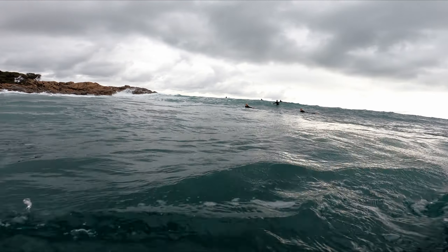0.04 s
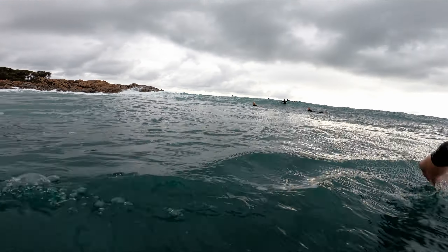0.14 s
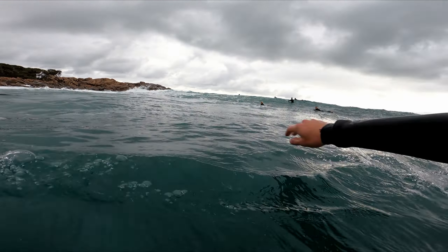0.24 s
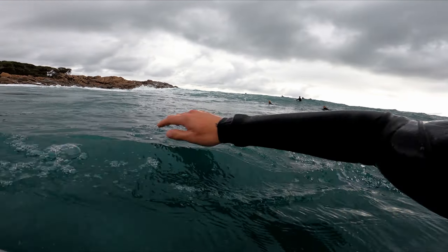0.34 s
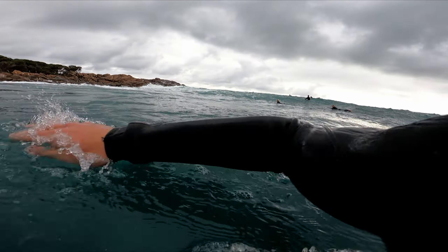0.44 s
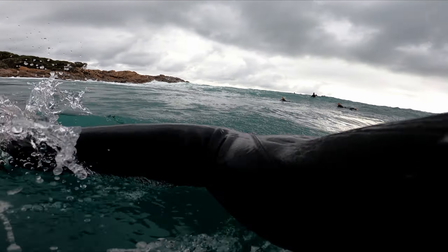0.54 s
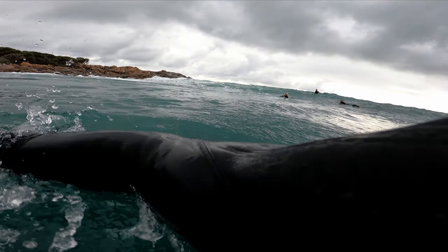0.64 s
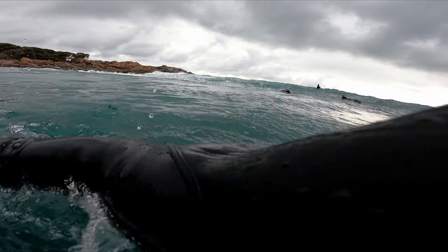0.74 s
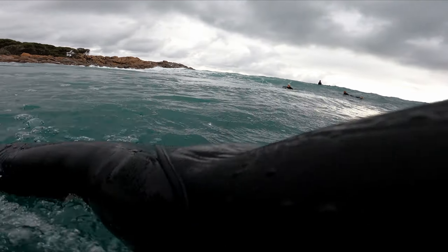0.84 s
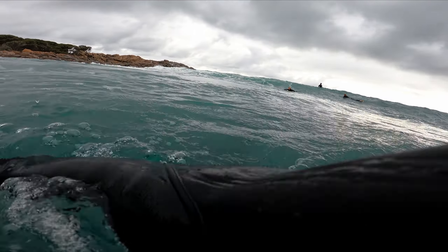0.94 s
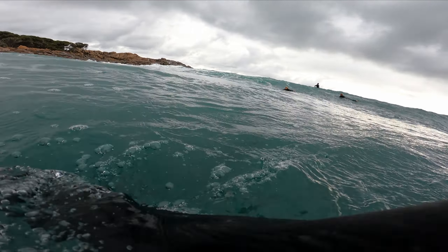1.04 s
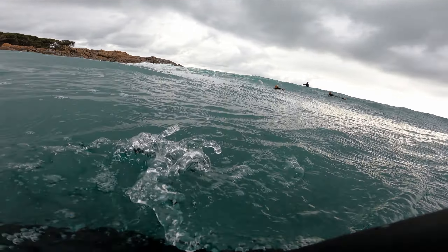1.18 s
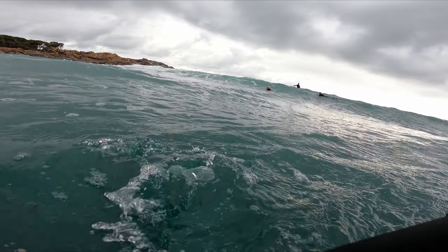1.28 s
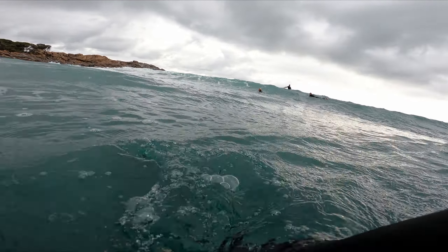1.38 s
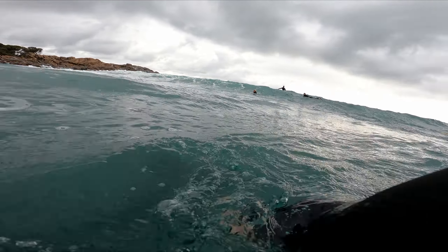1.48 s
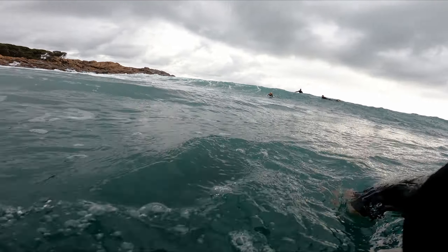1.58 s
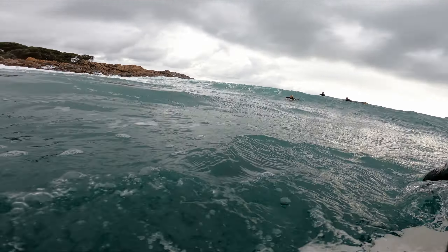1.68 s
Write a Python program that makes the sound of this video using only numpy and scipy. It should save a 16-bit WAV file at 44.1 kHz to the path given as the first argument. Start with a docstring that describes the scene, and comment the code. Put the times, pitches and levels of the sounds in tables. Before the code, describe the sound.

Open choppy sea, recorded extremely close by a camera in a housing at water level. From 0 s spray fizzes while water gurgles low over the housing and patters with a hollow ring near 1 kHz. From 0.2 to 1 s paddling splashes bring crisp droplets, slaps and small gulping air pockets; short bubbly blips continue to 1.5 s. At 1.5-1.7 s wet rubber squelches in quick gliding squeaks, with wind thumps, then a coarser rub at 2 s with strong gurgling. Drops tick around 2.3-2.5 s; near 3 s the water sags away and quietens. Surges and glugs crowd 3.2-4.4 s, with a short squeak at 4.1 s and a wind gust near 4.5 s. Spray becomes even foam hiss, swelling from 5.2 s to 6 s, with faint rubbery slips around 5.4 s. Bright spray sits left, hollow muffled water right.

```python
"""A surfer paddles through choppy sea with a camera at water level, in wind that swells and dies for six seconds.
From the start spray fizzes, and surge after surge gurgles over the housing, rings its hollow near 1 kHz and often
muffles the spray. Wet rubber first squelches at 1.5 s; the water sags away most deeply near 3 s.
From about 4.3 s the spray is mostly even foam, and it swells toward the end.
The open left port hears the spray; the flooded right one hears mostly the housing."""
import sys
import numpy as np
from scipy import signal
from scipy.fft import rfft, irfft, next_fast_len
from scipy.io import wavfile
from scipy.ndimage import uniform_filter1d, minimum_filter1d, map_coordinates

SR = 44100
rng = np.random.default_rng(int(sys.argv[2]) if len(sys.argv) > 2 else 0)


def digitize_waveform(pressure):
    """Quantize a signal to 16-bit integers and store it at the path in sys.argv[1].

    Rows of a 2-D input are taken as channels; values are limited to [-1, 1].
    """
    field = np.atleast_2d(pressure).T
    bounded = np.clip(field, -1, 1)
    quanta = np.round(bounded * 32767).astype(np.int16)
    wavfile.write(sys.argv[1], SR, quanta)


N = 266805  # samples, about 6.05 s

# All levels in the tables are relative: filters, trims and the two ports act on them later.
# water washing over the housing: t/s, length/s, gurgle rise/dB, patter rise/dB, muffling of the spray/dB
SURGES = [(0, .068, 8.5, 2, 2.5), (0.273, 0.045, 0.5, 4.5, -6.5), (0.648, 0.23, 0, 3, 0),
          (0.793, 0.19, 3.5, 3.5, 11.5), (1.031, 0.025, 8.5, 5.5, 0.5), (1.253, 0.041, -7, 2.5, -6),
          (1.368, 0.032, 0, 10.5, 3), (1.499, 0.087, -3, 3.5, 5.5), (1.585, 0.12, 14.5, 6.5, 7),
          (2.015, 0.17, 12.5, 14, 11.5), (2.567, 0.23, 5, 3, 0.5), (2.788, 0.17, 10.5, 4, 11.5),
          (2.859, 0.054, 3, 4, 7), (3.176, 0.047, 6, 6, 5), (3.236, 0.13, 9, 5.5, 10.5),
          (3.399, 0.035, 0, 5, 6), (3.55, .22, 7.5, 3, 14), (3.631, 0.057, 6, 5.5, 0),
          (3.959, 0.11, 6.5, 2, -2), (4.125, 0.033, 1, 12, 14), (4.181, 0.13, 6, -1.5, 4.5),
          (4.379, 0.14, 6, -2.5, 2.5), (4.602, 0.062, 10, 0.5, -5.5), (4.718, 0.022, 11.5, 5, 1.5),
          (4.985, 0.16, 4.5, 1, -0.5), (5.288, 0.074, 9, 5, 8), (5.463, 0.072, 6.5, 5, 8),
          (5.534, 0.061, 6.5, 6, -5), (5.626, .17, -1.5, -0.5, -10), (5.871, 0.033, 3.5, -5.5, 0.5)]
# pockets of trapped air: t/s, length/s, first f/Hz, last f/Hz, bow of the glide/octaves, level/dB
POCKETS = [(.045, 0.029, 191, 155.6, -0.11, -19), (.622, 0.072, 282, 326, -.12, -25.5),
           (0.679, 0.036, 880, 683, 0, -20), (0.686, .022, 1040, 915, 0, -19.5),
           (.718, 0.032, 1028, 1210, .04, -22), (.84, 0.021, 446, 377, 0, -19.5),
           (0.844, 0.092, 213, 131, -.3, -13), (.938, .02, 500, 545, 0, -24.5),
           (.945, .04, 133.6, 194, 0.065, -20.5), (.997, .075, 152.3, 143.4, 0, -21.5),
           (1.037, 0.017, 1290, 1504, 0, -26.5), (1.051, 0.012, 1086, 572, -0.084, -22),
           (1.128, 0.014, 1150, 1060, 0, -23), (1.172, .012, 1090, 1200, 0, -18.5),
           (1.213, .02, 1220, 1120, 0, -21.5), (1.27, .013, 954, 1130, 0, -16.5),
           (1.321, 0.02, 1460, 940, -0.059, -21), (1.381, 0.025, 940, 1035, 0, -23.5),
           (1.405, .029, 498, 704, -0.067, -23.5), (1.416, .009, 1200, 1206, 0, -21.5),
           (1.454, 0.0072, 1104, 1266, 0.083, -16.5), (1.624, .014, 202, 150, -0.32, -25),
           (1.855, 0.0074, 1414, 1710, 0, -21.5), (1.888, 0.019, 1020, 1146, .05, -18),
           (1.914, .024, 1070, 1400, 0, -21.5), (1.934, 0.0073, 1830, 1990, 0.049, -19.5),
           (2.019, .032, 198, 147.6, -.08, -13), (2.058, .045, 147.7, 115, 0.072, -22),
           (2.128, .028, 159, 148, 0.023, -14), (2.172, 0.037, 164, 151, 0, -18),
           (2.536, 0.022, 973, 1085, 0, -23), (2.559, 0.0096, 1156, 1340, 0, -23),
           (2.608, .045, 817, 600, 0, -24), (2.79, 0.028, 169.6, 230, 0.1, -18),
           (2.825, .028, 231, 159.4, 0.067, -20), (2.623, .009, 1360, 1233, 0, -21),
           (2.857, 0.029, 248, 452, 0.25, -18.5), (2.889, 0.014, 982, 1123, 0, -18),
           (2.9, 0.017, 406, 264, -0.062, -17), (2.924, 0.036, 293, 125.4, 0, -26.5),
           (3.174, 0.024, 914, 1190, -0.069, -24.5), (3.197, 0.038, 297, 191, .55, -17.5),
           (3.256, 0.044, 876, 968, 0.023, -26), (3.303, 0.057, 1018, 943, 0.032, -24.5),
           (3.289, 0.065, 123, 267, 0, -20.5), (3.362, 0.028, 175, 139, -0.086, -18.5),
           (3.547, 0.0066, 1214, 1100, 0, -21.5), (3.573, 0.014, 186, 222, -0.048, -16.5),
           (3.61, .028, 171, 219, 0, -15), (3.644, 0.041, 202, 303, 0.23, -18.5),
           (3.712, 0.04, 872, 1038, -.03, -16), (3.72, .055, 295, 158.5, -.2, -20),
           (3.733, 0.02, 1043, 1370, 0, -23), (3.745, .022, 924, 964, 0, -20),
           (3.835, 0.03, 245, 188.4, 0.098, -18), (3.955, .055, 180.5, 201, -.04, -18.5),
           (4.011, 0.018, 965, 1063, 0, -20.5), (4.013, 0.054, 233, 171.5, 0, -20),
           (4.144, .009, 280, 850, .15, -23), (4.149, .018, 860, 1075, .07, -15),
           (4.166, 0.0091, 1133, 1710, 0, -34.5), (4.184, 0.027, 272, 165.5, 0.22, -19),
           (4.205, 0.013, 988, 419, 0.066, -19.5), (4.265, 0.036, 402, 429, .55, -22.5),
           (4.266, .014, 804, 1057, 0, -20), (4.31, 0.063, 1070, 1108, -.16, -35.5),
           (4.317, 0.038, 113.5, 160, 0.16, -19), (4.383, 0.036, 113, 123.6, -.1, -16),
           (4.425, .095, 157, 137.5, 0.25, -23.5), (4.6, 0.08, 180.7, 161.7, -.06, -19),
           (4.82, 0.023, 201, 195, 0, -17.5), (5.012, .044, 226.5, 245, .62, -21),
           (5.079, .03, 193, 160, 0.091, -17.5), (5.305, 0.012, 884, 962, -0.056, -19),
           (5.3, .035, 151, 200, 0.13, -20.5), (5.482, .026, 177, 347, 0, -20),
           (5.675, 0.029, 228, 172, 0, -24), (5.872, .028, 193, 218, 0, -19.5)]
# wet rubber slipping on the mount: t/s, length/s, first slip rate f/Hz, last slip rate f/Hz,
# bow of the glide/octaves, level/dB, change per harmonic/dB, grit (a plain factor)
SLIPS = [(1.492, .027, 287, 588, -0.068, -16.5, -7, 0.33), (1.536, .031, 218, 600, -0.023, -21, -7, 0.49),
         (1.59, .021, 474, 267, -0.19, -18, -2.5, .5), (1.607, 0.047, 268, 183, .08, -23.5, 0.5, .45),
         (1.652, 0.049, 180.8, 204, -.07, -23.5, 0.3, .5), (1.695, 0.041, 208.8, 184.4, 0, -25.5, 0.27, .5),
         (2.021, .075, 168.5, 108.8, 0, -29, 0.5, 1.8), (2.092, 0.088, 116.6, 137.2, 0, -26, 0, 1.5),
         (4.113, .026, 201.5, 701, -0.036, -16.5, -1, .7), (4.124, .021, 558, 918, -0.015, -16.5, 0, 1.2),
         (4.267, 0.033, 144.8, 122.5, 0.045, -25, -0.5, 1.9), (5.345, .02, 389, 475, 0, -16, -2.5, 1.7),
         (5.363, .019, 451, 354, -0.024, -19.5, 0.5, 3.4), (5.538, .088, 130.6, 105, -0.012, -27.5, 0, 4.2)]
# colour of droplets at the open port: f/Hz, level/dB
DROPLET_COLOUR = [(300, -9.5), (1000, 11.5), (1800, -4.5), (2400, -6.5), (3200, -5.5), (4000, -2),
                  (4400, -5.5), (5100, -12.5), (6200, -15.5), (7200, -22.5), (8500, -39), (10000, -48),
                  (11800, -36), (13200, -63.5)]
# colour of the finest drops: f/Hz, level/dB
MIST_COLOUR = [(1500, -30), (3000, -5.5), (4000, 4), (5000, 1), (6200, -1), (7200, -10.5), (8500, -29.5),
               (10000, -45.5), (11800, -37.5), (13200, -60)]
# colour of the housing when water strikes it hard: f/Hz, level/dB
HARD_COLOUR = [(150, -28.5), (500, -2.5), (900, -2), (1400, -4), (1800, -13.5), (2250, -15.5),
               (3000, -44.5), (5000, -87.5)]
SURGE_EDGE_S = 0.013  # time in which a surge arrives, and leaves


def amp(db):
    """Decibels to gain."""
    return 10 ** (np.asarray(db) / 20)


def unit(x):
    """Scale x to an overall rms of 1."""
    return x / np.sqrt(np.mean(x ** 2) + 1e-20)


def steady(x, size):
    """Even out x so that its rms stays near 1 over stretches of about size samples."""
    power = uniform_filter1d(x ** 2, size, axis=-1)
    power = uniform_filter1d(power, size // 2, axis=-1)
    return x / np.sqrt(np.abs(power) + 1e-12)


def along(points, hz):
    """Read (Hz, value) points on a log frequency axis."""
    f, v = np.transpose(points)
    return np.interp(np.log(hz + 1), np.log(f + 1), v)


def curve(rows):
    """Join (s, value) rows by straight lines, one value per sample."""
    return np.interp(np.arange(N) / SR, *np.transpose(rows))


def wobble(rate):
    """A smooth random curve with rate random knots a second."""
    knots = rng.standard_normal(int(N * rate / SR) + 4)
    return map_coordinates(knots, [np.arange(N) * rate / SR])


def add(track, s, sound):
    """Mix a sound into a track at time s."""
    part = track[max(round(s * SR), 0):][:len(sound)]
    part += sound[:len(part)]


def grid():
    """A padded FFT length and its frequencies."""
    size = 2 * next_fast_len(N // 2 + 8192)
    return size, np.fft.rfftfreq(size, 1 / SR)


def coloured(x, spectrum):
    """Filter x to a (Hz, dB) shape; the folded cepstrum makes the filter causal, with no echo ahead of a sound."""
    size, hz = grid()
    cepstrum = irfft(np.log(amp(along(spectrum, hz))))
    cepstrum[1:size // 2] *= 2
    cepstrum[size // 2 + 1:] = 0
    response = np.exp(rfft(cepstrum))
    return irfft(rfft(x, size) * response, size)[..., :N]


def bubbles(rate, low_hz, high_hz, cycles, spread_db, glide):
    """A cloud of fading, gliding bubble tones, rate per second: many are weak, a few strong."""
    count = int(rate * N / SR)
    when, pitch, size, life, bend = rng.random((count, 5)).T[:, :, None]
    hz = low_hz + (high_hz - low_hz) * pitch
    span = cycles * (.5 + life) / hz  # seconds to fade by 40 dB
    step = np.arange(int(min(1.5 * cycles / low_hz, .12) * SR))
    t = step / SR
    age = np.minimum(t / span, 2)
    bent_hz = hz * (1 + glide * (2 * bend - .5) * age / 2)
    tone = np.sin(2 * np.pi * bent_hz * t) * amp(-40 * age)
    gain = np.sqrt(hz) * amp(-spread_db * np.log(.01 + size))
    place = (when * N).astype(int) + step
    return unit(np.bincount(place.ravel(), (gain * tone).ravel(), N)[:N])


def froth(cloud, wash_db, spectrum):
    """Two unrelated bubble clouds, each on a wash of noise, coloured and set to rms 1."""
    raw = np.array([cloud(), cloud()]) + amp(wash_db) * rng.standard_normal((2, N))
    return unit(coloured(raw, spectrum))


def sweep(length, first_hz, last_hz, bow):
    """Progress 0-1 and phase of a pitch glide that arches by bow octaves at its middle."""
    u = np.linspace(0, 1, max(int(length * SR), 2))
    arch = 2 ** (bow * (1 - (2 * u - 1) ** 2))
    hz = first_hz * (last_hz / first_hz) ** u * arch
    return u, 2 * np.pi * np.cumsum(hz) / SR


def retuned(pair, hz):
    """Read a ringing pair faster or slower, so its resonance follows the curve relative to the curve's mean."""
    place = np.cumsum(hz / hz.mean())
    return np.array([map_coordinates(x, [place], mode="mirror") for x in pair])


def plinks(rows, cycles, click_db, spectrum):
    """Each impact is a sharp click and a short ring, which falls 60 dB in the given cycles; then all is coloured."""
    track, t = np.zeros(N), np.arange(SR // 20) / SR
    for s, db, hz in rows:
        ring = np.cos(2 * np.pi * hz * t) * amp(-60 * t * hz / cycles)
        click = amp(click_db) * (t == 0)
        add(track, s, amp(db) * (ring + click))
    return coloured(track, spectrum)


def swells(rows, edge_s):
    """Level change in dB from (s, length s, dB) events that rise, hold and fall."""
    total = 0
    for s, length, db in rows:
        end = s + max(length, edge_s) - edge_s / 2
        total = total + curve([(s - edge_s / 2, 0), (s + edge_s / 2, db), (end, db), (s + length + edge_s / 2, 0)])
    return total


def hush(rows, depth_db):
    """Level change in dB while the listed events take the place of loose, churning water."""
    t = np.arange(N) / SR
    covered = np.any([(t > s) & (t < s + length) for s, length, *_ in rows], axis=0)
    return -depth_db * uniform_filter1d(covered.astype(float), size=400)


def gaps_db(pockets):
    """Loose water gives way to a ringing pocket of air, and far more while the rubber slips."""
    return np.minimum(hush(pockets, 3.5), hush(SLIPS, 15))


def trough_db():
    """Loss of level as the water sags away from the housing and returns."""
    # the water drops away: t/s, length/s, depth/dB
    sags = [(0.211, 0.049, 3.5), (0.966, 0.068, 7), (1.469, 0.02, 4), (1.518, 0.023, 5),
            (1.561, 0.022, 6.5), (1.737, 0.08, 1), (2.145, 0.15, 11.5), (2.904, 0.06, 10.5),
            (2.917, 0.24, 18.5), (2.949, 0.022, 9), (3.341, 0.028, 5.5), (3.498, 0.054, 15.5),
            (3.809, 0.13, 9), (4.05, 0.066, 7.5), (4.154, 0.046, 15), (4.357, 0.07, 4.5), (4.676, 0.076, 3),
            (4.756, 0.036, 10.5)]
    t = np.arange(N) / SR
    return sum(db * np.sin(np.pi * np.clip((t - s) / length, 0, 1)) for s, length, db in sags)


def chop_db():
    """Push of the water on the housing between surges."""
    # how hard the chop works: t/s, level/dB
    chop = [(0.0, -31.5), (0.7, -29.5), (1.2, -31), (2.4, -30.0), (4.5, -27.5), (6.05, -28)]
    return curve(chop) - trough_db()


def film_db():
    """Muffling by the film of water that builds through a surge, clings to the open port and drains."""
    cling_s, drain_s = 0.011, 0.076
    total = 0
    for s, length, _, _, db in SURGES:
        clung = s + length + cling_s
        total = total + curve([(s, 0), (s + length, db), (clung, db), (clung + drain_s, 0)])
    return np.maximum(0, total)


def crest_db():
    """A surge with a muffling film patters softer at first and harder as it ends; negative film turns this round."""
    crest = 0.088  # dB of patter below, then above, for each dB of film
    return sum(curve([(s - SURGE_EDGE_S, 0), (s, -crest * db), (s + length, crest * db), (s + length + SURGE_EDGE_S, 0)])
               for s, length, _, _, db in SURGES)


def spray_db():
    """Spray at the open port: showers lift it, the film of the surges muffles it."""
    # fizz of the broken water around the camera: t/s, level/dB
    sea = [(0, -44.5), (.12, -40.5), (.5, -40), (.8, -38.5), (1.05, -43.5), (1.7, -44.5), (2.6, -37),
           (3.0, -46), (3.6, -41.5), (4.3, -46), (4.8, -40.5), (5.3, -36), (5.55, -34), (5.68, -36),
           (5.87, -32), (6.05, -35)]
    # showers thrown up by strokes and wavelets: t/s, length/s, rise of the spray/dB
    showers = [(.233, .223, 3.5), (.548, 0.092, 3.5), (.785, 0.025, 3.5), (.875, 0.075, 7),
               (1.08, 0.091, 3), (1.194, 0.047, 6.5), (1.236, 0.037, 8.5), (1.321, .125, 7.5),
               (1.828, 0.18, 4), (2.255, 0.17, 3.5), (3.085, 0.11, 3.5), (3.518, 0.052, 6.5),
               (3.921, .079, 7), (4.375, .07, 4), (4.445, 0.15, 10), (4.66, 0.07, 4.5), (4.775, 0.22, 6.5),
               (5.155, .15, 5), (5.43, 0.059, 1), (5.575, 0.058, 2.5), (5.63, .44, 3.5)]
    return curve(sea) + swells(showers, edge_s=0.0071) - film_db()


def slosh():
    """Large air pockets gurgle as water shoves past the housing: low bubble tones on a wash of noise."""
    # colour of the gurgle: f/Hz, level/dB
    gurgle = [(50, -50.5), (100, -1.5), (150, -2), (220, -3), (320, -8), (500, -12.5), (750, -15.5),
              (1200, -25), (1800, -30.5), (4000, -87)]

    def cloud():
        return bubbles(rate=220, low_hz=112.7, high_hz=745.0, cycles=15.8, spread_db=1.0, glide=.45)

    push_db = chop_db() + swells([(s, length, db) for s, length, db, _, _ in SURGES], SURGE_EDGE_S)
    push_db = push_db + 0.069 * (push_db - push_db.mean())  # gurgling grows faster than the push
    gaps = gaps_db([row for row in POCKETS if row[2] < 500])
    return steady(froth(cloud, 0.91, gurgle), size=1500) * amp(push_db + 1.4 * wobble(28) + gaps - 2.0)


def patter():
    """Dense small impacts ring the hollow behind the flooded port; harder water mixes in the hard-struck colour."""
    # colour of the ringing housing: f/Hz, level/dB
    housing = [(200, -28.5), (500, -22), (800, -6), (945, 2), (1080, 1.5), (1300, -2.5), (1500, -13),
               (1750, -21), (2500, -19.5), (5000, -101.5)]
    # pitch of the hollow as water fills and leaves it; only its ratio to the mean counts: t/s, f/Hz
    hollow = [(0.0, 1010), (0.74, 1049), (1.14, 1119), (1.68, 962.2), (1.94, 1132), (2.19, 919.6),
              (2.24, 1081), (2.81, 981.2), (2.85, 1100), (3.2, 1010), (4.87, 998.6), (5.15, 1114),
              (5.37, 908.4), (5.41, 1059), (5.59, 969.8), (5.68, 1155), (5.9, 1043), (6.05, 1140)]

    def cloud():
        return bubbles(rate=600, low_hz=600, high_hz=1702, cycles=24.3, spread_db=1, glide=0.14)

    force_db = chop_db() + swells([(s, length, db) for s, length, _, db, _ in SURGES], SURGE_EDGE_S)
    force_db = force_db + 1.5 * wobble(25) + crest_db()
    hard = np.clip((force_db + 27.5) / 45, 0, .2)  # share of hard-struck sound
    wash_db = -2
    soft_ring = np.sqrt(1 - hard) * froth(cloud, wash_db, housing)
    hard_ring = np.sqrt(hard) * froth(cloud, wash_db, HARD_COLOUR)
    gaps = gaps_db([row for row in POCKETS if row[2] > 500])
    return steady(retuned(soft_ring + hard_ring, curve(hollow)), size=1300) * amp(force_db + gaps - 1.22)


def glugs():
    """A trapped pocket of air swells quickly, slides in pitch as it is squeezed and rings out; water dulls its edges."""
    tremble = .016  # random step of the phase, radians per sample
    track = np.zeros(N)
    for s, length, first_hz, last_hz, bow, db in POCKETS:
        u, phase = sweep(length, first_hz, last_hz, bow)
        phase = phase + tremble * np.cumsum(rng.standard_normal(len(u)))
        swell = np.abs(np.sin(np.pi * u ** 0.65)) ** .6
        add(track, s, amp(db) * np.sin(phase) * swell)
    return coloured(track, [(2000, -1.0), (3000, -22.0), (6000, -62.5)])


def slaps():
    """Water slaps the housing: a strong click and a very short ring near 1 kHz."""
    # slaps on the housing: t/s, level/dB, f/Hz
    slap_rows = [(0.204, -8.5, 993), (0.253, -10, 1126), (0.949, -10, 1180), (0.964, -13.5, 1183),
                 (0.976, -8, 1120), (2.332, -16, 970), (2.526, -13.5, 925), (2.9755, -11, 1067),
                 (3.091, -18.5, 1090), (4.24, -17.5, 1006), (4.31, -17, 1020), (4.323, -14.5, 1010),
                 (4.341, -12.5, 997), (4.072, -10.5, 1095), (4.675, -12.5, 1074), (4.776, -12, 896)]
    return plinks(slap_rows, cycles=12, click_db=7.5, spectrum=HARD_COLOUR)


def squelches():
    """Stick and slip: a gliding, uneven train of soft pulses drives the housing; each slip carries a little grit."""
    # colour of the squelching rubber: f/Hz, level/dB
    rubber = [(80, -10.5), (200, 0.5), (350, -11.5), (600, -9.5), (780, -8), (970, 0.5), (1080, -6),
              (1220, -12), (1420, -9.5), (1700, -27.5), (2200, -28), (4000, -84)]
    smear = 0.11  # radians per harmonic squared: the soft rubber smears each slip in time
    track = np.zeros(N)
    order = np.arange(1, 15)[:, None]  # harmonics
    for s, length, first_hz, last_hz, bow, db, tilt_db, rough in SLIPS:
        u, phase = sweep(length, first_hz, last_hz, bow)
        phase = phase + 0.008 * np.cumsum(rng.standard_normal(len(u)))
        grit = rough * (1 + np.cos(phase)) * rng.standard_normal(len(u))
        harmonics = amp(tilt_db * (order - 2)) * np.sin(order * phase - smear * order ** 2)
        pulses = harmonics.sum(axis=0) + grit
        add(track, s, amp(db) * pulses * np.sqrt(np.abs(np.sin(np.pi * u))))
    return coloured(track * amp(1.5 * wobble(200)), rubber)


def spray():
    """Broken water: ringing droplets with sharp ticks, crossfaded with the even noise of foam."""
    # colour of the foam: f/Hz, level/dB
    foam_colour = [(300, -34), (1000, 6.5), (1800, -8.5), (2400, -8.5), (3200, -3.5), (3800, 0.5),
                   (4400, -4), (5100, -13.5), (6200, -19.5), (7200, -29.5), (8500, -46), (10000, -74.5),
                   (11800, -57), (13200, -79.5)]

    def cloud():
        rings = bubbles(rate=1300, low_hz=1480, high_hz=8680, cycles=35, spread_db=3.6, glide=0.13)
        sharp = bubbles(rate=170, low_hz=2760, high_hz=8500, cycles=4.5, spread_db=3.2, glide=.1)
        return rings + amp(1.5) * sharp

    droplets = steady(froth(cloud, -8.0, DROPLET_COLOUR) * amp(3.8 * wobble(90)), size=6000)
    hiss = unit(coloured(rng.standard_normal((2, N)), foam_colour)) * amp(1.1 * wobble(50))
    foam = np.clip(curve([(0, 0.42), (3, 0.15), (4.3, 0.93), (5, 0.78), (6, 0.96)]), 0, 1)  # (s, share of foam)
    mix = np.sqrt(1 - foam) * droplets + np.sqrt(foam) * hiss
    return mix * amp(spray_db() + 0.87 * wobble(22.18) + 2.0)


def splintered(rows):
    """Each drop breaks into two smaller ones that land just after it, at differing delays and pitches."""
    latest_s, softer_db, count = 0.01, -8.5, 2
    chance = rng.random((len(rows), count, 2))
    pieces = list(rows)
    for (s, db, hz), draws in zip(rows, chance):
        for late, detune in draws:
            pieces.append((s + latest_s * late, db + softer_db, hz * 2 ** (0.67 * (detune - .5))))
    return pieces


def drops():
    """Single drops land by the open port: a click and a ring, followed by their splinters."""
    # drops landing: t/s, level/dB, f/Hz
    drop_rows = [(.122, -23, 3800), (.154, -19.5, 3530), (0.229, -19, 3470), (.271, -25, 3620),
                 (.2955, -22, 4140), (0.3035, -12.5, 2960), (0.363, -12.5, 3560), (.3665, -17.5, 4470),
                 (0.371, -14.5, 3810), (0.3917, -17, 3960), (.4342, -22.5, 4270), (.443, -15, 4600),
                 (.451, -26, 4340), (.548, -24, 3700), (.569, -29, 3900), (.577, -18.5, 3450),
                 (.6716, -21, 3770), (.7155, -27, 4000), (0.7382, -14.5, 4730), (.764, -21.5, 4080),
                 (.786, -25, 3150), (.804, -20.5, 2940), (.811, -17.5, 4870), (.82, -19, 4770),
                 (.8777, -34, 3040), (1.2085, -17, 4200), (1.2396, -26, 3900), (1.3358, -19.5, 4040),
                 (1.4375, -16.5, 4250), (1.533, -26.5, 4340), (1.8524, -19.5, 4200), (1.9232, -19.5, 4260),
                 (1.9826, -21, 3900), (2.059, -26, 3980), (2.2628, -8.5, 5250), (2.324, -25, 2930),
                 (2.35, -34.5, 3800), (2.4372, -15.5, 3980), (2.457, -15, 4160), (2.554, -19.5, 4130),
                 (3.002, -27, 4130), (3.058, -27.5, 3840), (3.0937, -23, 3670), (3.138, -24, 3750),
                 (3.527, -24, 4350), (3.537, -13, 5600), (3.556, -16.5, 5100), (3.6467, -19, 4270),
                 (4.38, -24.5, 4120), (4.4804, -14, 4100), (4.7767, -21, 4030), (4.8215, -23, 3960),
                 (5.156, -19.5, 3850)]
    return plinks(splintered(drop_rows), cycles=41, click_db=-2, spectrum=DROPLET_COLOUR)


def mist():
    """Stronger showers throw finer drops, which tick in bright clumps."""
    offset_db, growth = -11, 0.2  # against the spray curve; extra dB for each dB of stronger spray

    def cloud():
        return bubbles(rate=450, low_hz=3200, high_hz=8000, cycles=5, spread_db=2.6, glide=.1)

    open_db = spray_db()
    clumps = steady(froth(cloud, -4.5, MIST_COLOUR) * amp(2.9 * wobble(110)), size=5000)
    return clumps * amp(open_db + growth * (open_db - open_db.mean()) + offset_db)


def port_ticks():
    """Fine drops hit the open port itself: a click and a ring of a few cycles."""
    # drops on the port: t/s, level/dB, f/Hz
    tick_rows = [(0.3662, -32, 5350), (0.7149, -34, 6020), (0.7384, -29, 5810), (0.8771, -36.5, 6000),
                 (1.223, -29, 5560), (1.2395, -24, 5420), (1.4463, -24, 6420), (1.8538, -25, 6000),
                 (1.9235, -31, 6110), (2.2622, -25, 5200), (2.2966, -32, 5240), (2.35, -29, 5990),
                 (2.443, -24, 5650), (2.5543, -37, 5520), (3.094, -35, 5330), (3.5235, -33, 6480),
                 (3.5355, -27, 5490), (3.9306, -34, 5260)]
    return plinks(tick_rows, cycles=6, click_db=-3, spectrum=MIST_COLOUR)


def churn():
    """Middle-sized bubbles in the water that the arm has stirred; they weaken in the troughs and under squelches."""
    # water stirred up by the paddling arm: t/s, level/dB
    stirring = [(0, -36.5), (.8, -35.5), (1.1, -37), (1.9, -38), (2.6, -38.5), (3.3, -40), (6.05, -45)]
    # colour of the stirred water: f/Hz, level/dB
    stirred_colour = [(120, -34), (300, -2), (550, -0.5), (800, -7), (1200, -5.5), (1800, -15.5),
                      (4000, -60)]

    def cloud():
        return bubbles(rate=300, low_hz=278.7, high_hz=933, cycles=18, spread_db=2.5, glide=0.28)

    level_db = curve(stirring) - trough_db() + hush(SLIPS, 8.5)
    return steady(froth(cloud, -0.81, stirred_colour), size=4000) * amp(level_db)


def wind():
    """Low, lumpy buffeting: noise from a breeze with small random eddies and a few large ones."""
    # strength of the breeze on the microphones: t/s, level/dB
    breeze = [(0.0, -27), (0.35, -29), (1.0, -26.5), (1.85, -30), (2.25, -27), (2.42, -23), (2.72, -26.5),
              (3.2, -27.5), (3.6, -27), (4.07, -29.5), (4.2, -25), (4.5, -21), (4.63, -34), (4.8, -27),
              (5.5, -24.5), (6.05, -24)]
    # large eddies that hit the ports: t/s, rise/dB
    buffets = [(0.941, 5.5), (1.251, 0.5), (1.437, 0), (1.598, 11.5), (1.665, 9), (1.748, 11), (1.907, 7),
               (2.084, 6.5), (3.424, 9.5), (4.186, 8), (5.166, 5), (5.402, 1.5), (5.958, 7.5)]
    # colour of the wind: f/Hz, level/dB
    rumble_colour = [(10, -12), (25, 2), (42, -0.5), (65, -4), (100, -6), (150, -15), (300, -22),
                     (800, -57), (2000, -120)]
    half_width_s = 0.022  # of a large eddy
    t = np.arange(N) / SR
    eddies_db = sum(db * np.exp(-((t - s) / half_width_s) ** 2) for s, db in buffets) + 1.5 * wobble(16)
    rumble = steady(coloured(rng.standard_normal((2, N)), rumble_colour), size=3500)
    return rumble * amp(curve(breeze) + eddies_db + 0.94)


def ports(shared, stray):
    """The open left port and the flooded right one differ in gain and phase; stray sound reaches them unalike."""
    # how much louder the left port hears: f/Hz, left minus right level/dB
    balance = [(100, -5.5), (250, -6.5), (550, -7), (850, -11), (1300, -11), (1600, -7), (2000, 0.43),
               (3000, 4.9), (4000, 10), (5000, 19.93), (8000, 23.73)]
    # how far the left port leads: f/Hz, phase/radians
    lead = [(110, -0.03), (170, 0.68), (500, 0.58), (1200, 1.45), (1400, -1.5), (1650, -1.99),
            (5000, -1.58)]
    # how alike the ports hear: f/Hz, likeness 0-1
    alike = [(100, 0.9), (300, 1), (800, 0.74), (1000, 1), (1200, 0.76), (1470, 0.88), (2000, 0.15),
             (3500, 0.19), (4500, 0.68), (5100, 0.87)]
    size, hz = grid()
    a, b = rfft(shared, size), rfft(stray, size)
    ratio = amp(along(balance, hz)) * np.exp(1j * along(lead, hz))
    turn = np.arccos(np.clip(along(alike, hz), 0, 1)) / 2
    a, b = a * np.cos(turn), b * np.sin(turn)
    pair = np.array([ratio * (a + b), a - b]) * 2 / np.abs(1 + ratio)
    return irfft(pair, size)[:, :N]


def panned(pair, lean_db):
    """Lean a stereo pair to the left; the open port takes most of the change."""
    return pair * amp([0.75 * lean_db, -.2 * lean_db]).reshape(2, -1)


def scene():
    """Wind and spray reach the ports through the air; water on the housing leans right when the spray is weak."""
    # the camera rolls, so that the water presses more on one side: t/s, lean to the left/dB
    roll = [(0, 0.5), (.5, 3.5), (1.2, 1), (1.7, -3), (2.4, 0), (3.3, -1.5), (3.8, -2), (4.5, -2),
            (5.3, -2.5), (6.05, 1)]
    # the wind veers: t/s, lean to the left/dB
    veer = [(0, 0), (.7, 3), (1.7, -1.5), (2.7, 0), (3.7, -0.5), (4.5, -1), (5.3, 2.5), (6.05, 1)]
    shared, stray = slosh() + patter()
    water = ports(shared + slaps() + amp(0.5) * glugs() + squelches(), stray)
    open_db = spray_db()
    lean_db = curve(roll) + 0.28 * (open_db - open_db.mean())  # more spray leans the water left
    shared, stray = spray() + mist()
    air = ports(shared + amp(2.5) * drops() + amp(9.5) * port_ticks(), stray)
    stirred = panned(ports(*churn()), 7.5)  # the arm works on the side of the open port
    buffeting = panned(ports(*wind()), curve(veer))
    return panned(water, lean_db) + air + stirred + buffeting


def record(dry):
    """The camera's limiter holds down the highest peaks; nothing above its band limit is kept."""
    ceiling, top_hz = .68, 13000
    size, hz = grid()
    need = 1 / np.maximum(1, np.abs(dry).max(axis=0) / ceiling)
    gain = uniform_filter1d(minimum_filter1d(need, size=500), size=400)
    ends = signal.windows.tukey(N, .002)  # brief fades at both ends
    return irfft(rfft(dry * gain * ends, size) * (hz < top_hz), size)[:, :N]


dry = scene()
out = record(dry)
digitize_waveform(out)
```